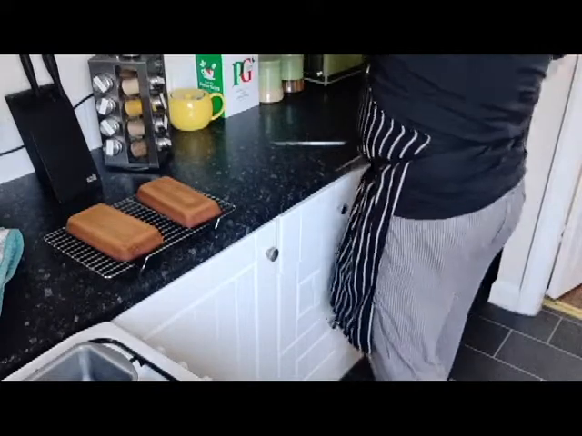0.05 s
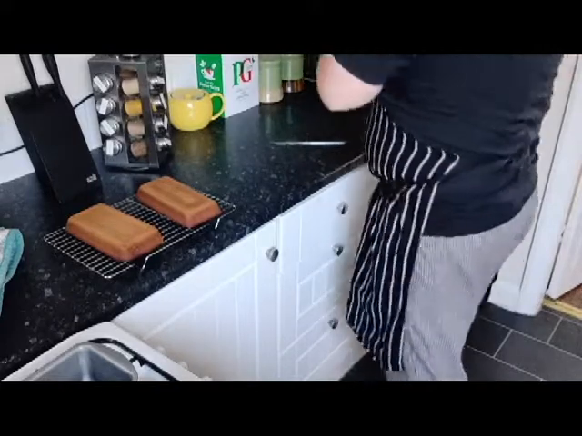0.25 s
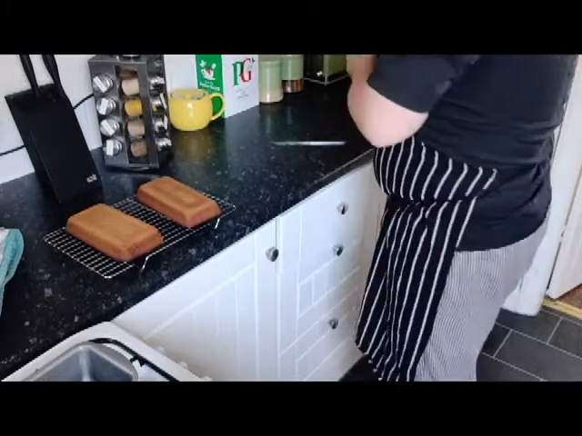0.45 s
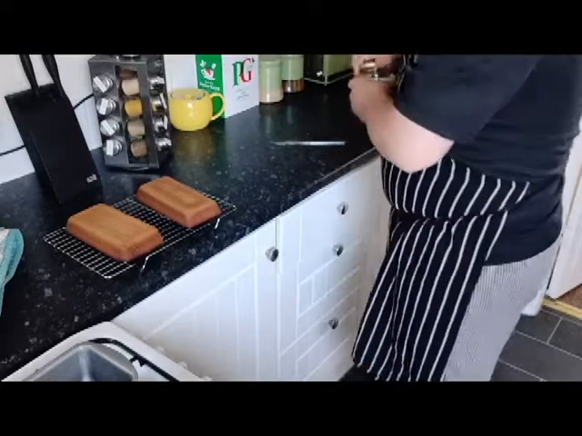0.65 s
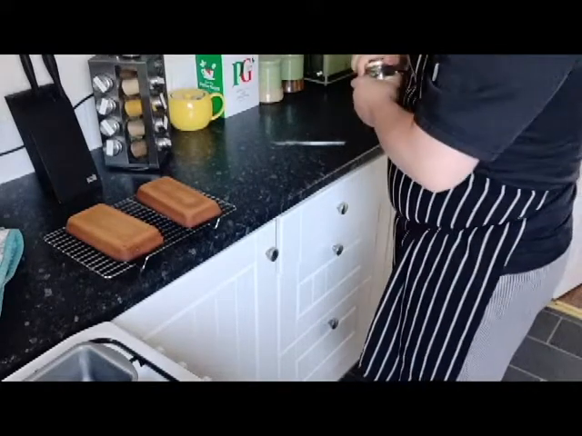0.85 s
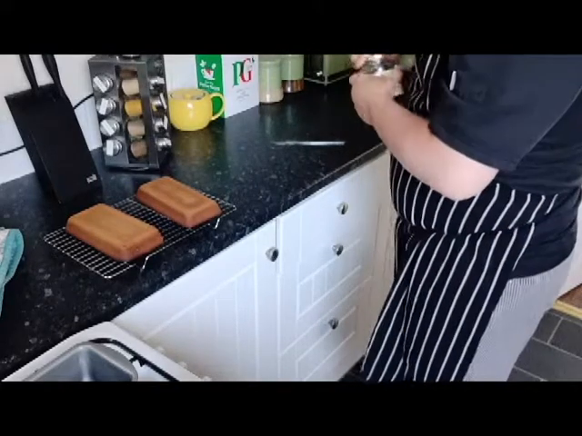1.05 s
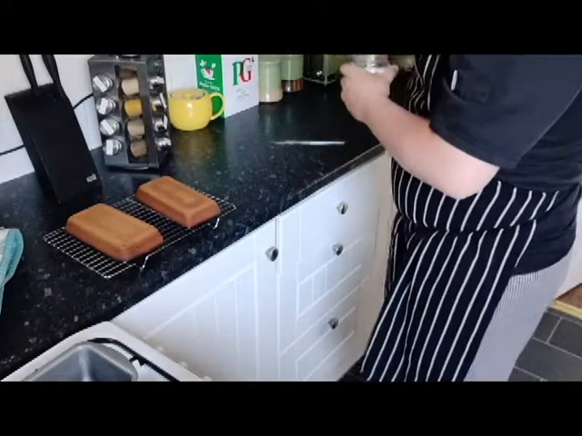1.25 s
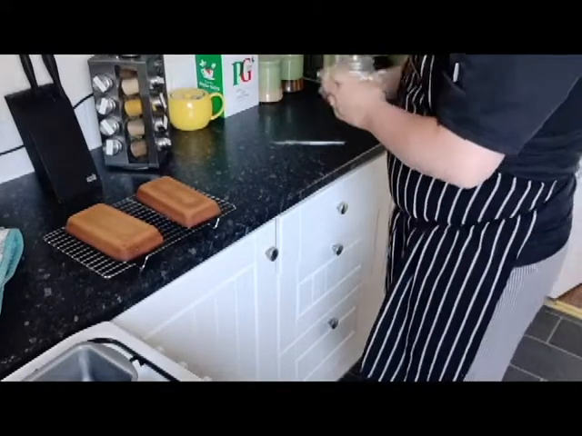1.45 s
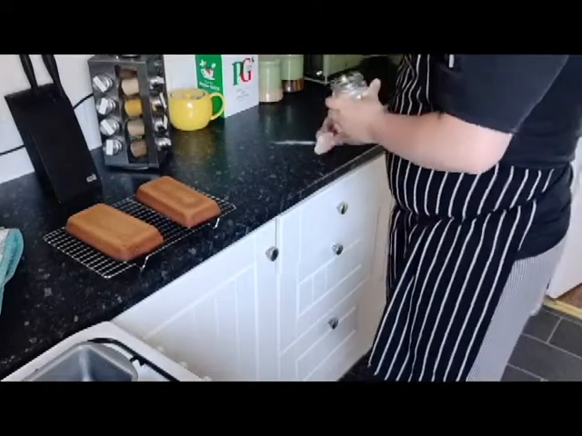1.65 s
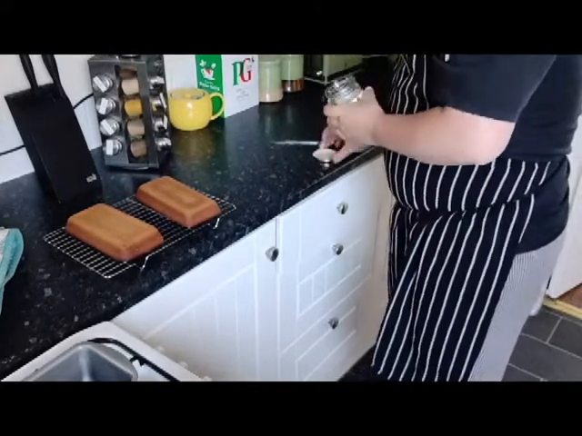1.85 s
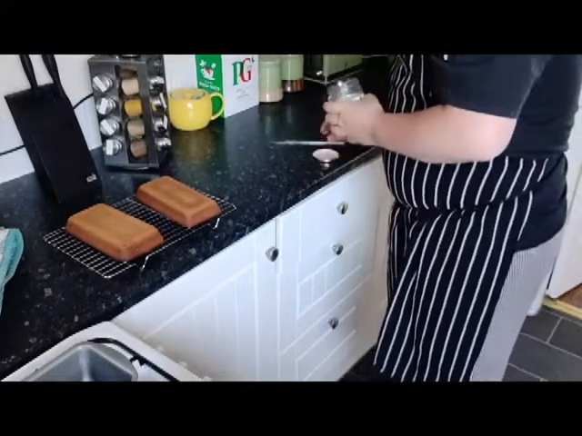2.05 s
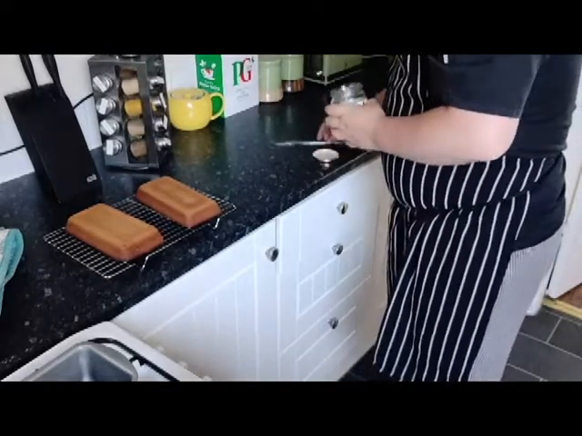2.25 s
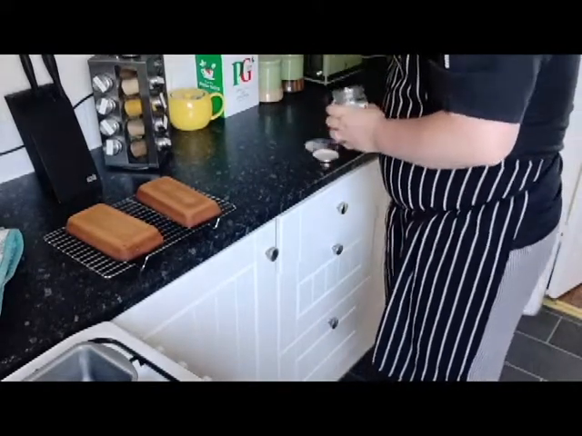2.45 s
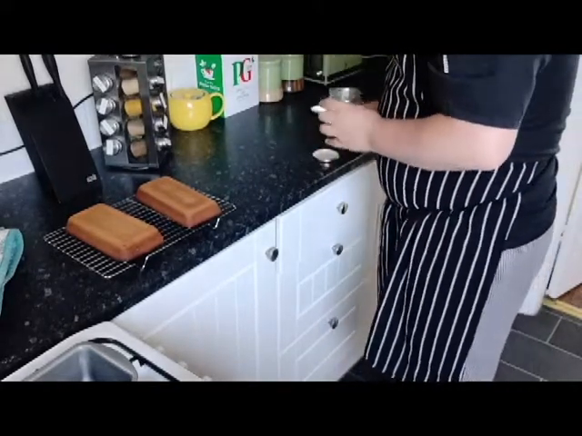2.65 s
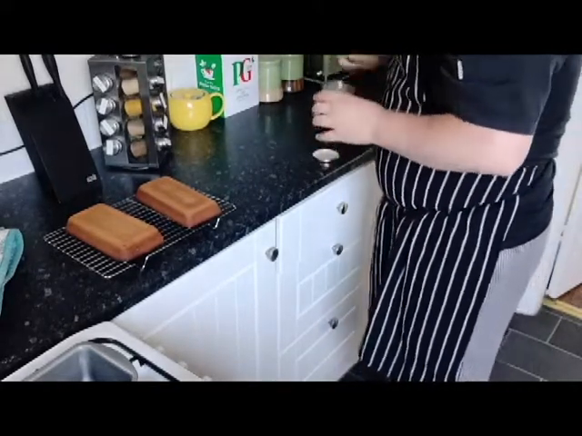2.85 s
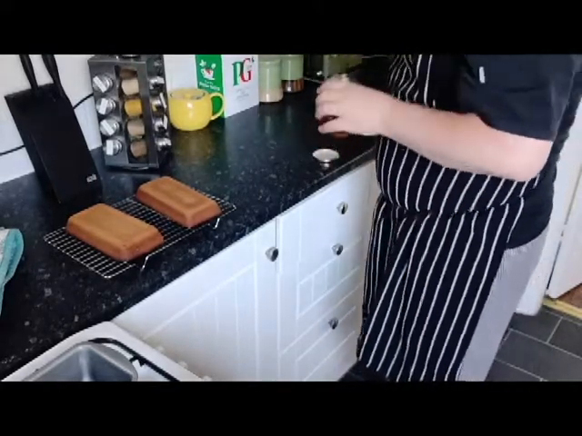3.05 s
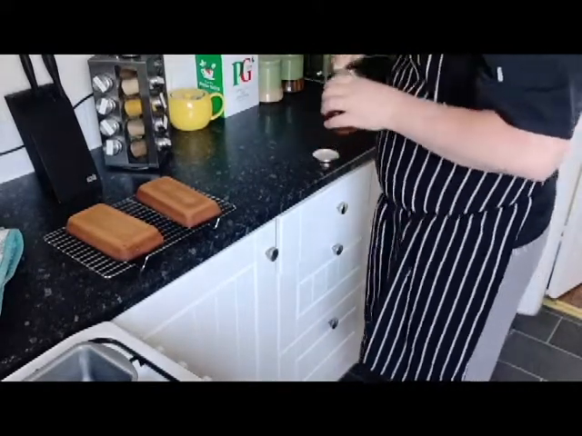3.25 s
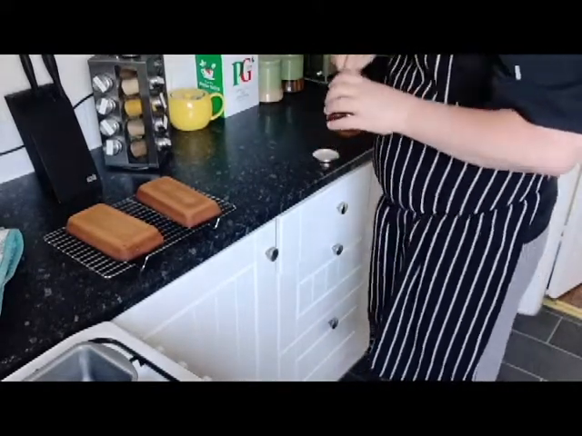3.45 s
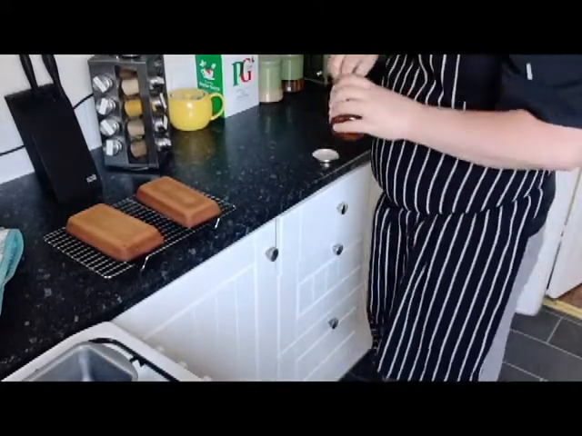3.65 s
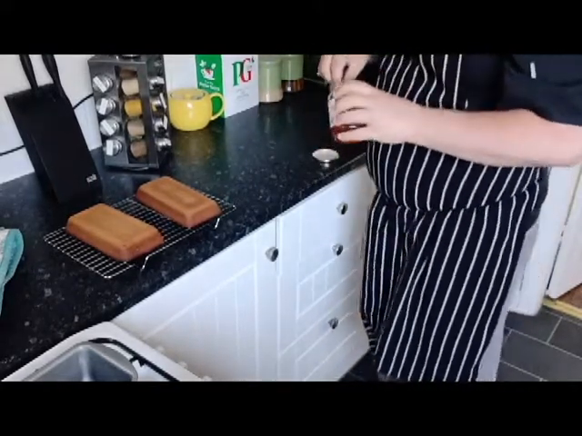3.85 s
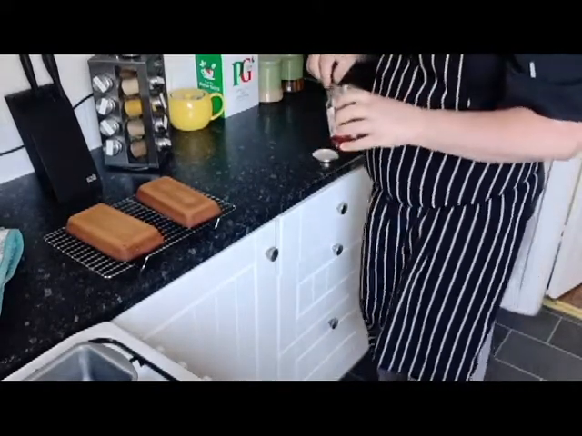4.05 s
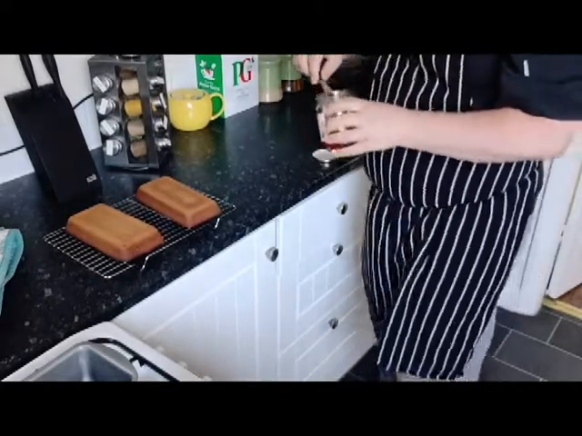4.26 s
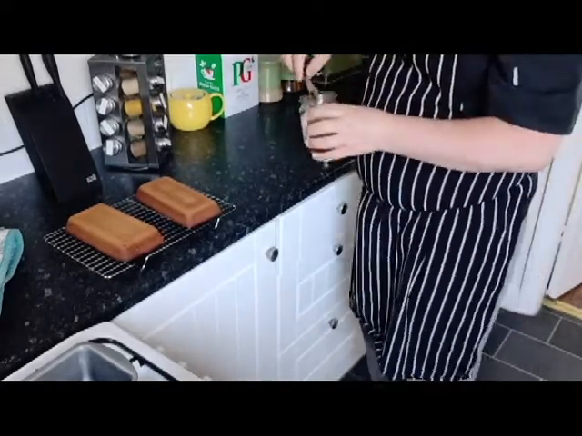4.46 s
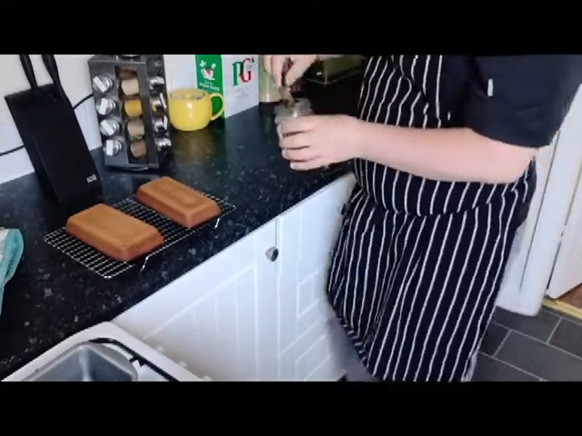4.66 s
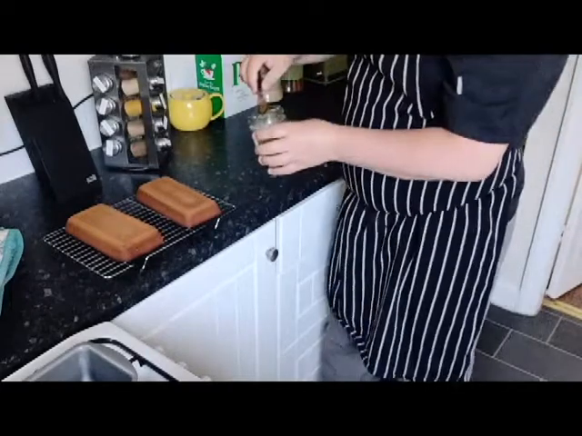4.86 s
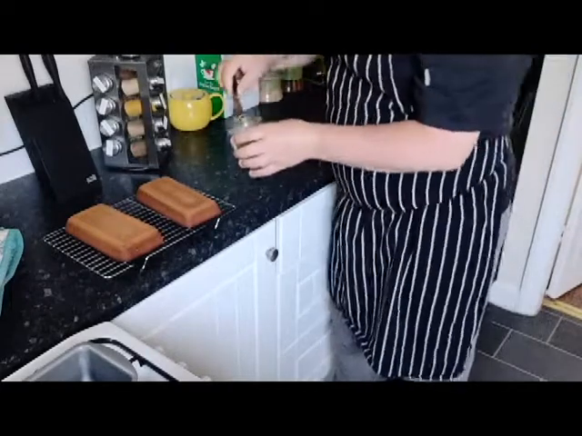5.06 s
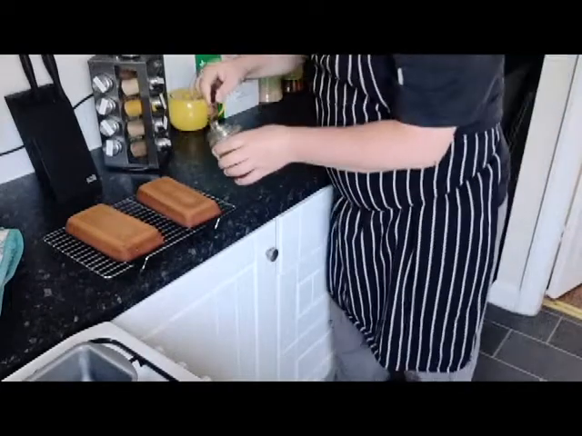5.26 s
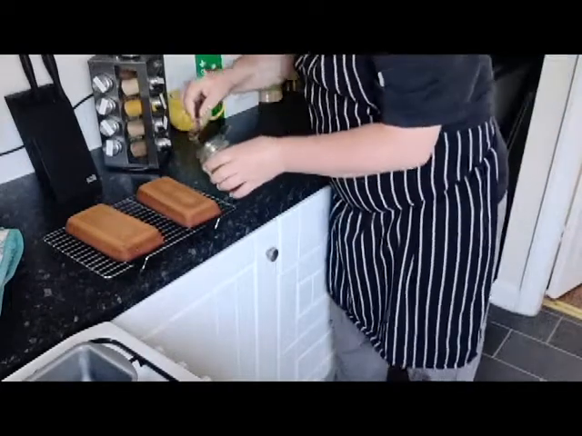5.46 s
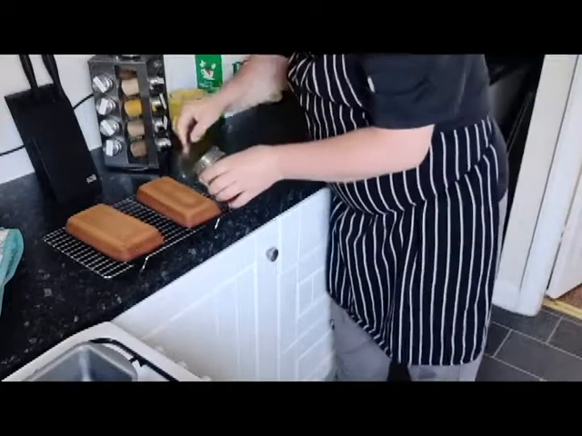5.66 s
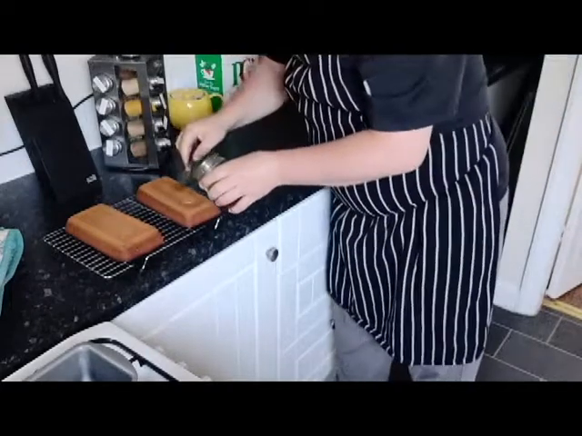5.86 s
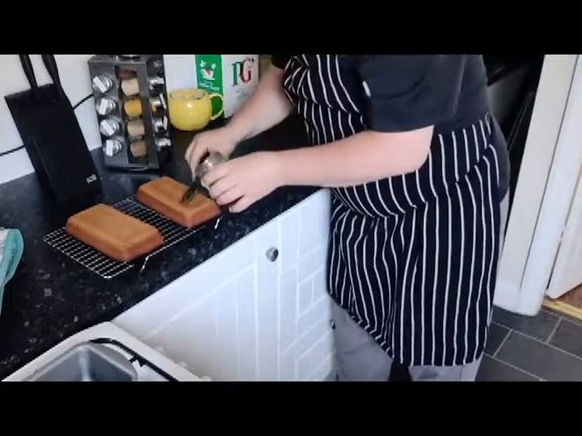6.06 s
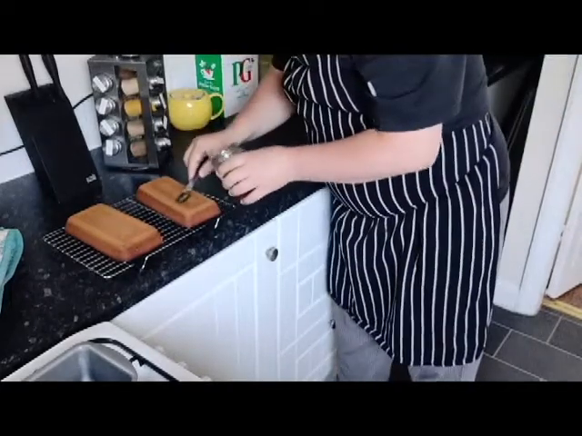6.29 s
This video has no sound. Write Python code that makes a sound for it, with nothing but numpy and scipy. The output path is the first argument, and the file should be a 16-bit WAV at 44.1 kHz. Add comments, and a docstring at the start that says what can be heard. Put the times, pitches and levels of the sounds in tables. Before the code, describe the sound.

In a small, hard-surfaced kitchen, a glass jar lid pops loose with gritty metal twists, then drops on the stone counter with a short clatter. A knife slides away with a bright metallic scrape and knock, clinks the glass and stirs lightly inside. A cupboard door bumps with a latch clack near the end. Low body thuds, faint hum and hiss lie underneath; one channel, small microphone, dull on top.

```python
"""Jar and knife in a kitchen

In a small hard kitchen a lid is twisted off a glass jar and dropped on the stone counter; a knife
slides off the counter and works in the jar; a cupboard door is bumped. Blows drive resonances and a
short-cut room echo; strokes drive them with gritty noise. Low thuds, a fridge hum and faint hiss."""
import sys
import numpy as np
from scipy import signal
from scipy.fft import rfft, irfft
from scipy.io import wavfile
from scipy.ndimage import uniform_filter1d, map_coordinates

SR = 44100
rng = np.random.default_rng(int(sys.argv[2]) if len(sys.argv) > 2 else 0)


def unload_wav(signal):
    """Save mono or channel-first audio to the path in sys.argv[1] as 16-bit WAV at rate SR, clipped to [-1, 1]."""
    wavfile.write(
        sys.argv[1],
        SR,
        np.round(np.clip(np.atleast_2d(signal).T, -1, 1) * 32767).astype(np.int16),
    )


N = 278874

# Struck things: broad colour (frequency [Hz], level [dB]),
# then resonances (frequency [Hz], width [Hz], level [dB])
THREAD = ([(200, -30), (900, -35.5), (1900, -23.5), (2400, -10), (4200, 2), (6300, 5), (12000, -7)],
           [(2116, 48, -1), (4700, 160, 7.5), (6560, 150, 10), (7250, 160, 16)])
CAP = (THREAD[0], [(2080, 60, 4.6), (3070, 54, 6.4), (3860, 49, 7.3), (4700, 52, 4.5), (6100, 170, 8)])
LID = ([(200, -30), (600, -23.5), (1100, -38.5), (2400, -20), (3700, -8.5), (6500, -11.5), (12000, -23.5)],
        [(1480, 80, -6.5), (1586, 28, -1.5), (1986, 60, -4), (3040, 43.6, -4), (3272, 41.3, 7),
        (4240, 84, -3.5), (5274, 44, 3), (6550, 63, -3.5)])
HANDLE = ([(200, -21), (900, -21), (2200, -12), (3200, -11), (5500, -7.5), (6800, -9.5), (12000, -28)],
           [(2128, 18, 3), (2280, 28, 1), (2456, 16, 2.5), (4460, 120, -3), (5500, 140, -2),
           (6580, 160, 3.5)])
BLADE = ([(200, -26.5), (800, -18.5), (1500, -4), (4500, -9), (6200, 2), (9000, -0.5), (14000, -10.5)],
          [(1100, 12, -4), (1528, 15, -2.5), (2400, 40, -4), (4163, 80, -5.5), (5440, 26, -5.5),
          (6020, 32, 4), (6510, 120, 3), (7450, 27, 6.5), (9060, 43, 6), (10450, 52, 2)])
KNIFE_TIP = ([(2000, -27.5), (5000, -11), (9000, -26.5)], [(3600, 30, -11.5), (5000, 15, -9.5)])
COUNTER = ([(150, -41.5), (350, -15), (1100, -1.5), (2500, -3.5), (4000, -12.5), (6500, -15),
            (12000, -39.5)], [(706, 15, 1), (900, 36, -3), (1099, 32, 3), (1392, 21.4, 2), (1800, 190, -4),
            (2630, 93, -1.5)])
GLASS = ([(200, -16.5), (1000, -12.5), (2300, -13), (3000, 8.5), (3700, -28.5), (6000, -1.5), (12000, -40)],
          [(2870, 71, 2.5), (4500, 78, -13), (2913, 33, 8), (2954, 36, 6.5), (3070, 12, 9.5),
          (4130, 31, -3.5), (4186, 45, -5.5), (5840, 11, -2), (5750, 36, 4.5), (6200, 60, -13),
          (10600, 66.3, -15.5)])
JAR_WALL = ([(250, -8.5), (600, -4.5), (2000, 2), (2600, -0.5), (4500, 6), (6400, 10), (12000, -2)],
             [(2070, 61, 0.5), (2920, 32, 3), (4630, 88, 4.5), (6300, 64, 9)])
JAR_RIM = ([(1000, -44), (3100, -2), (9000, -16)], [(3085, 27.5, 3), (4170, 25, -13), (5940, 60, -13.5)])
DOOR = ([(100, -19.5), (250, -12.5), (700, -12), (1250, -15.5), (2500, -29), (3900, -29), (7000, -47)],
         [(124, 29.4, 0.5), (294, 23, -14), (368.5, 15, 1.5), (708, 15, -5.5), (1211, 96, -7.5),
         (1790, 40, -18)])
DOOR_LATCH = ([(2600, -46), (3800, 8), (6000, -29)], [(3290, 44, 3), (3820, 64, 1), (4050, 46, -1)])

# Kinds of contact: (tick level [dB], rattle t60 [s])
CATCH, CLANK, KNOCK = (2, 0.054), (-11, 0.048), (-8, 0.1)
CLINK, BUMP, CLATTER = (-5, 0.035), (-25, 0.05), (-5.5, .06)

# Blows: (time [s], level of first 40 ms before the cut [dB], ring over thud [dB],
# tilt [dB/octave], echo [dB], time until the tail is cut [s])
THREAD_POPS = [(0.8899, -15.5, -28, -1.5, 9, 0.078)]
THREAD_TWISTS = [(1.139, -21, -5.5, 2.5, -2.5, 0.016), (1.154, -36.5, 1, -7.5, 9, 0.039),
                 (1.261, -28.5, 3, 8.5, 0.5, 0.023), (1.372, -46.5, -3, 0, 10, 0.059)]
CAP_SLIPS = [(1.068, -40.5, 0, -1, 4.9, 0.13)]
LID_DROPS = [(1.8053, -14, -0.49, -0.6, 5.2, 0.1)]
HANDLE_KNOCKS = [(1.951, -25.5, 2, -1.9, 1.5, 0.058), (1.956, -20.5, -.3, 1, -22, 0.0072)]
COUNTER_SET_DOWNS = [(2.5525, -15, -1.5, -0.7, 2.1, 0.083), (2.569, -25.5, 1.5, -0.5, 3.2, 0.066)]
TIP_TINGS = [(2.601, -33, 14, 0.73, -6.5, 0.1)]
RIM_PINGS = [(3.2906, -46.5, 22, .3, 0.5, 0.027)]
GLASS_CLINKS = [(3.5172, -16.5, 1, 3.5, 1, 0.12), (3.83, -41, 21.5, -9, -6, 0.035),
                (3.868, -45.5, 32, 7, -4, 0.012), (3.949, -56, 1.1, 0, -3, 0.013),
                (4.076, -40, 5, 15, 0, 0.048)]
WALL_TAPS = [(4.581, -32, 3.5, 11, -10, 0.01), (4.606, -24.5, 25.5, -11.5, 3, 0.0066),
             (4.697, -36, 7.7, -8.5, 1.5, 0.015)]
DOOR_BUMPS = [(4.021, -53.5, 0.83, 5.5, 6.1, 0.12), (4.876, -39.5, 0.089, -5.5, 11, 0.033),
              (5.306, -46.5, 2.6, 5.5, 9.2, 0.029), (5.429, -19.5, 6.5, 1.6, 4.7, 0.068)]
LATCH_CLACKS = [(5.4363, -31.5, 7.2, .3, 4, 0.056)]

# Strokes: (time of full pressure [s], level [dB], tilt [dB/octave], rise [s], hold [s])
BLADE_SLIDES = [(2.493, -12, 1, 0.093, 0.013), (2.535, -17.5, -3.5, .06, 0.031)]
WALL_STIRS = [(4.178, -24, 7.5, 0.066, 0.016), (4.219, -38, 1, .02, 0.0046),
              (4.38, -49, 1.5, 0.095, 0.0073), (4.588, -24, -1.3, 0.019, 0.058),
              (4.70, -36, -1.5, 0.2, 0.0027), (4.872, -51.5, -2.3, 0.042, 0.066)]

# Feet and body through floor and cupboards:
# (time of peak [s], nominal level [dB], centre [Hz], spread [s])
BODY_THUDS = [(0.971, -50.5, 427, 0.03), (1.086, -43.5, 307, 0.016), (1.429, -57.5, 129, 0.051),
              (2.309, -49.5, 140, 0.057), (2.46, -45.5, 150, 0.036), (3.616, -32.5, 172.4, 0.013),
              (3.665, -43.5, 164, .018), (4.089, -44.5, 166.1, 0.038), (4.21, -48, 121.5, 0.044),
              (4.633, -37, 131.6, 0.021), (4.718, -39, 132.3, 0.017), (4.915, -40.5, 116.5, 0.027),
              (5.348, -38, 286.8, .018), (5.353, -38.5, 128, .021), (5.465, -24, 366.5, 0.014),
              (5.484, -21.5, 124, 0.026)]

# Hiss colour: (frequency [Hz], level [dB])
HISS_COLOUR = [(40, -38.5), (70, -18.5), (90, -10.5), (110, -4), (140, -5.5), (300, -10.5), (800, -16),
               (3000, -23), (6300, -17.5), (9000, -24.5), (13000, -16.5)]
# Hiss loudness: (time [s], level [dB])
HISS_LEVEL = [(0, -53.5), (.85, -56.5), (1.1, -42), (1.5, -52), (2.3, -52.5), (3.1, -58), (3.9, -53.5),
              (4.4, -50.5), (5.1, -53), (6.32, -55.5)]
# Room tail: (frequency [Hz], rise time constant [s], t60 [s])
ROOM = [(150, 0.007, 0.8), (600, 0.011, 0.17), (2500, 0.0057, 0.46), (7000, 0.0041, 0.24),
        (11000, 0.0015, 0.13)]
# Tick returns from tiles and counter: (delay [s], level [dB])
BOUNCES = [(.0035, -3), (.013, -11.5)]
# Microphone response: (frequency [Hz], level [dB])
MIC = [(30, -29), (70, -8.5), (100, -0.5), (6700, -2), (7600, -15.5), (8300, -22), (15000, -22.5)]

STROKE_RISE_DB, STROKE_RISE_BEND, STROKE_FALL_DB_PER_S = 33.5, 1.1, 328
DULLING_PER_OCTAVE = 0.2  # dB/octave for each dB under full pressure


def gain_of(db):
    """Amplitude factor of a level in dB."""
    return 10 ** (np.asarray(db) / 20)


def evened(x):
    """Scales to unit RMS."""
    return x / np.sqrt(np.mean(x ** 2) + 1e-20)


def wander(shape, size):
    """Slow random drift of unit RMS, smoothed over size samples."""
    return evened(uniform_filter1d(rng.standard_normal(shape), size=size))


def read(points, hz):
    """Interpolates every column of a table over log frequency."""
    f, *values = np.transpose(points)
    return [np.interp(np.log(hz + 1), np.log(f + 1), v) for v in values]


def add(mix, start_s, sound):
    """Mixes a sound in from start_s."""
    part = mix[round(start_s * SR):][:len(sound)]
    part += sound[:len(part)]


def tilted(x, slope_db_per_octave):
    """Leans the spectrum about 2 kHz; the slope may change in time."""
    hz, t, z = signal.stft(x, SR, nperseg=256)
    slope = np.interp(t * SR, np.arange(len(x)), slope_db_per_octave * np.ones(len(x)))
    octaves = np.log2(np.clip(hz, 150, 9000) / 2000)[:, None]
    return signal.istft(z * gain_of(octaves * slope), SR, nperseg=256)[1][:len(x)]


def causal(points):
    """Minimum-phase pulse of the given colour."""
    log_gain = np.log(gain_of(read(points, abs(np.fft.fftfreq(4096, 1 / SR)))[0]))
    return np.fft.ifft(np.exp(np.conj(signal.hilbert(log_gain)))).real[:2048]


def hiss():
    """Coloured noise whose level drifts in patches of time and frequency."""
    frames, hz = N // 256 + 5, np.fft.rfftfreq(1024, 1 / SR)
    real, imag, patches = rng.standard_normal((3, len(hz), frames))
    patches = uniform_filter1d(patches, size=20, axis=0)
    patches = evened(uniform_filter1d(patches, size=8, axis=1))
    z = (real + 1j * imag) * gain_of(read(HISS_COLOUR, hz)[0][:, None] + 1.5 * patches)
    noise = evened(signal.istft(z, nperseg=1024, noverlap=768)[1][:N])
    return noise * gain_of(np.interp(np.arange(N) / SR, *np.transpose(HISS_LEVEL)))


def fridge_hum():
    """One sine near 100 Hz, wavering in level and pitch."""
    level_waver, pitch_waver = wander((2, N), 1500)
    hz = 100.2 + 2.0 * pitch_waver
    return gain_of(-62.5 + 4.6 * level_waver) * np.sin(2 * np.pi * np.cumsum(hz) / SR)


def body_thud(peak_s, db, centre_hz, spread_s):
    """Swell of one low wobbling resonance with two softer, looser overtones."""
    t = np.arange(-3 * spread_s, 4 * spread_s, 1 / SR)
    wobble = wander((4, len(t)), 400)
    phase = 2 * np.pi * (np.cumsum(centre_hz + 14 * wobble[0]) / SR + rng.random())
    tone = (1.3 + 0.6 * wobble[1]) * np.sin(phase)
    tone += 0.3 * wobble[2] * np.sin(2.0 * phase)
    tone += 0.11 * wobble[3] * np.sin(2.9 * phase)
    swell = np.exp(-.5 * (t / spread_s / np.where(t < 0, 1.05, .85)) ** 2)
    return max(peak_s + t[0], 0), gain_of(db) * tone * swell


def echo():
    """Fresh noise tail; each band builds and dies at its own pace, the top treble fastest."""
    hz, t, z = signal.stft(rng.standard_normal(SR // 2), SR, nperseg=256)
    rise_s, t60_s = (v[:, None] for v in read(ROOM, hz))
    shape = (1 - np.exp(-t / rise_s)) * gain_of(-60 * t / t60_s)
    shape = shape / np.linalg.norm(shape, axis=1)[:, None]
    tail = signal.istft(z * shape, SR, nperseg=256)[1]
    return tail / np.linalg.norm(tail)


def response(thing, ring_db):
    """Impulse response: a broad thud plus dying sines, the ring thinned below its first resonance."""
    colour, modes = thing
    thud, t = causal(colour), np.arange(SR // 5) / SR
    hz, width_hz, db = np.transpose(modes)[:, :, None]
    # uneven shapes split each resonance in three; narrow ones get weaker side lines
    up_hz, down_hz = 2.4 * width_hz * rng.uniform(0.38, 1.5, (2, len(modes), 1))
    sides = np.sin(2 * np.pi * (hz + up_hz) * t) - np.sin(2 * np.pi * (hz - down_hz) * t)
    waves = np.sin(2 * np.pi * hz * t) + .8 * np.minimum(width_hz / 32, 1) * sides
    decay = np.exp(-np.pi * width_hz * t)
    ring = (gain_of(db) * np.sqrt(width_hz) * decay * waves).sum(axis=0)
    highpass = signal.butter(2, 0.65 * modes[0][0], "high", fs=SR, output="sos")
    ring = signal.sosfilt(highpass, ring)
    out = gain_of(ring_db) * ring / np.linalg.norm(ring)
    add(out, 0, thud / np.linalg.norm(thud))
    return out


def contact_force(t, tick_db, rattle_t60_s, echo_db):
    """A tick, its bounces and uneven chatter, with the room's answer, spectrally evened."""
    lumps_db = 5.0 * wander(len(t), 30)  # the contact bounces unevenly
    envelope = gain_of(lumps_db - 60 * t / rattle_t60_s) * np.minimum(t / 0.002, 1)
    chatter = rng.standard_normal(len(t)) * envelope
    force = chatter / np.linalg.norm(chatter) + gain_of(tick_db) * (t == 0)
    for delay_s, bounce_db in BOUNCES:
        add(force, delay_s, gain_of([tick_db + bounce_db]))
    answer = signal.fftconvolve(force, echo())[:len(t)]
    spectrum = rfft(force + gain_of(echo_db) * answer)
    # a hard blow drives all resonances alike
    return irfft(spectrum / uniform_filter1d(abs(spectrum), size=40), len(t))


def blow(thing, tick_db, rattle_t60_s, start_s, db, ring_db, slope_db_per_octave, echo_db, hold_s):
    """Contact force rings the thing; the tail is cut after hold_s."""
    t = np.arange(SR // 2) / SR
    force = contact_force(t, tick_db, rattle_t60_s, echo_db)
    wet = signal.fftconvolve(force, response(thing, ring_db))[:len(t)]
    wet = tilted(wet, slope_db_per_octave)
    rock = 0.0026 * wander(len(t), 700)  # the thing rocks, so its pitch wanders
    wet = map_coordinates(wet, [np.arange(len(t)) + np.cumsum(rock)], order=3)
    knee = np.logaddexp(0, (t - hold_s) / 0.015)
    cut_db = 3.465 * knee * (1 + knee * 0.007 / 0.062)  # soft knee, then steepening
    first_40_ms = wet[:SR // 25]
    return start_s, gain_of(db - cut_db) * wet / np.sqrt(np.mean(first_40_ms ** 2) + 1e-20)


def scrape(thing, full_s, db, slope_db_per_octave, rise_s, hold_s, ring_db, grit_db):
    """Uneven grit under a stroke excites the thing; lighter pressure sounds duller."""
    t = np.arange(-.25, .35, 1 / SR)
    drop_db = STROKE_RISE_DB * np.maximum(-t / rise_s, 0) ** STROKE_RISE_BEND
    drop_db += STROKE_FALL_DB_PER_S * np.maximum(t - hold_s, 0)
    grit = rng.standard_normal(len(t)) * gain_of(grit_db * wander(len(t), 35))
    rub = signal.fftconvolve(grit, response(thing, ring_db))[:len(t)]
    dulling = DULLING_PER_OCTAVE * np.minimum(drop_db, STROKE_RISE_DB)
    rub = tilted(rub, slope_db_per_octave - dulling)
    return full_s + t[0], rub / np.std(rub[drop_db < 6]) * gain_of(db - drop_db)


def strike(mix, thing, contact, rows):
    """Adds every blow of one table."""
    for row in rows:
        add(mix, *blow(thing, *contact, *row))


def cupboard(mix):
    """Damped low door panel bumps and a bright latch clack."""
    strike(mix, DOOR, BUMP, DOOR_BUMPS)
    strike(mix, DOOR_LATCH, CLINK, LATCH_CLACKS)


def lid(mix):
    """Thread catches and clanks, the cap slips, the lid clatters down."""
    strike(mix, THREAD, CATCH, THREAD_POPS)
    strike(mix, THREAD, CLANK, THREAD_TWISTS)
    strike(mix, CAP, CLANK, CAP_SLIPS)
    strike(mix, LID, CLATTER, LID_DROPS)


def knife_and_jar(mix):
    """Handle, counter, tip and glass ring under blows; blade and jar wall rub under strokes."""
    strike(mix, HANDLE, KNOCK, HANDLE_KNOCKS)
    strike(mix, COUNTER, CLATTER, COUNTER_SET_DOWNS)
    strike(mix, KNIFE_TIP, CLINK, TIP_TINGS)
    strike(mix, JAR_RIM, CLANK, RIM_PINGS)
    strike(mix, GLASS, CLINK, GLASS_CLINKS)
    strike(mix, JAR_WALL, CLINK, WALL_TAPS)
    for row in BLADE_SLIDES:
        add(mix, *scrape(BLADE, *row, ring_db=1.0, grit_db=3.0))
    for row in WALL_STIRS:
        add(mix, *scrape(JAR_WALL, *row, ring_db=-11, grit_db=2.5))


def scene():
    """Sums background, thuds and struck things into one channel."""
    mix = hiss() + fridge_hum()
    for row in BODY_THUDS:
        add(mix, *body_thud(*row))
    cupboard(mix)
    lid(mix)
    knife_and_jar(mix)
    return mix[None]


def record(dry):
    """Small microphone, dull above 7 kHz and thin in the bass; soft overload; 16 kHz band limit."""
    x = signal.oaconvolve(dry, causal(MIC)[None])[:, :N]
    x = 1.66 * x / (1 + (1.75 * x) ** 4) ** .25
    lowpass = signal.firwin(511, 16000, window=("kaiser", 9), fs=SR)
    return signal.oaconvolve(x, lowpass[None], "same")


dry = scene()
out = record(dry)
unload_wav(out)
```